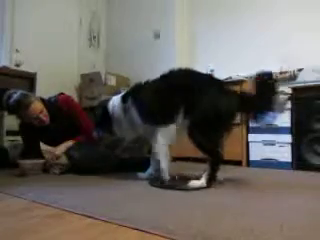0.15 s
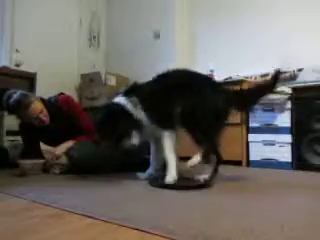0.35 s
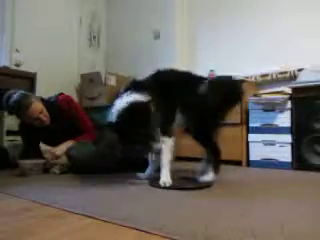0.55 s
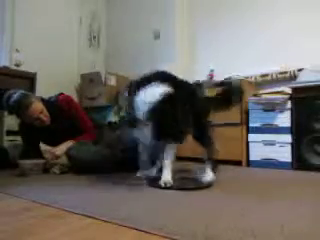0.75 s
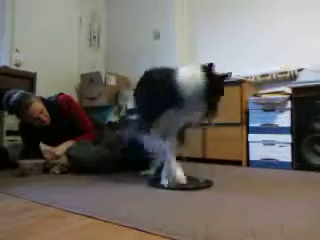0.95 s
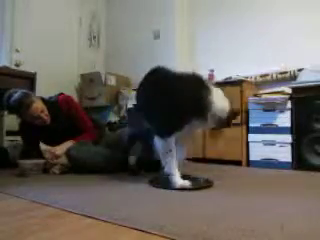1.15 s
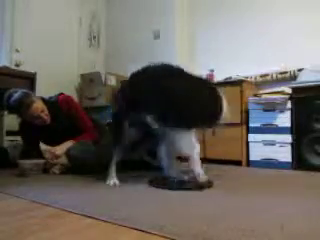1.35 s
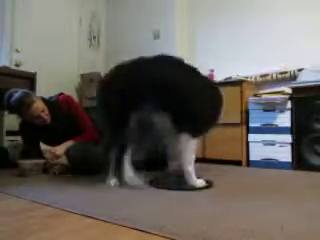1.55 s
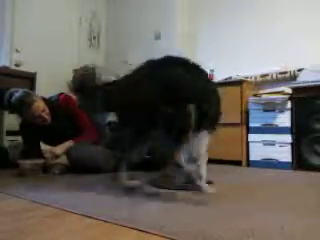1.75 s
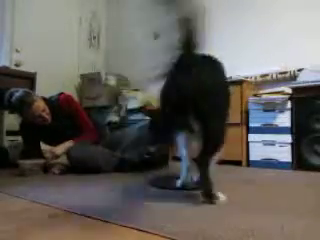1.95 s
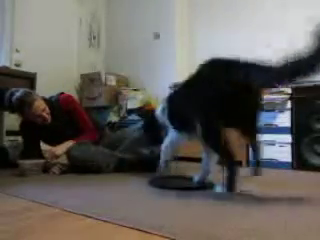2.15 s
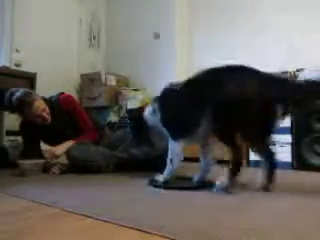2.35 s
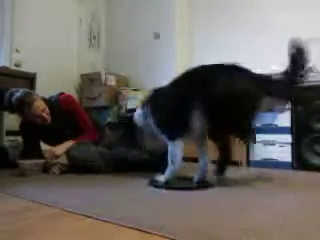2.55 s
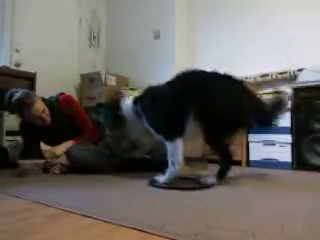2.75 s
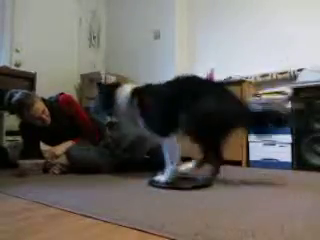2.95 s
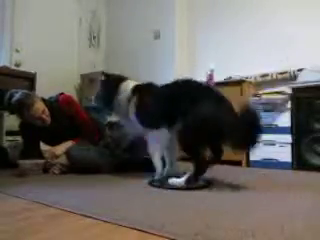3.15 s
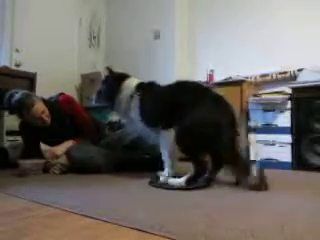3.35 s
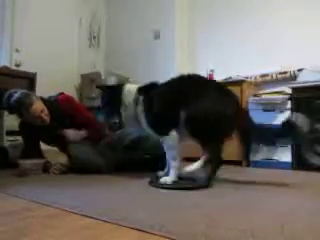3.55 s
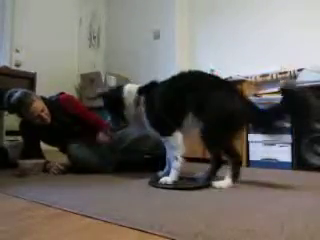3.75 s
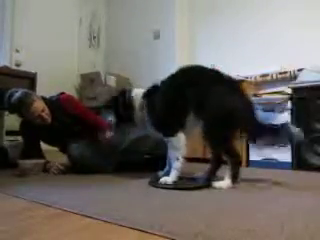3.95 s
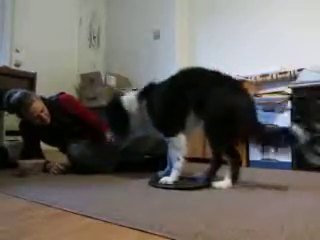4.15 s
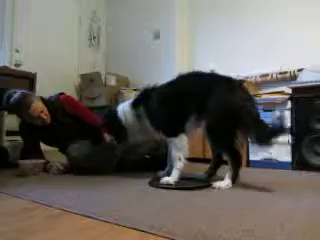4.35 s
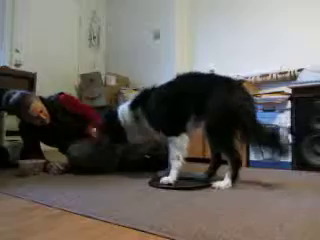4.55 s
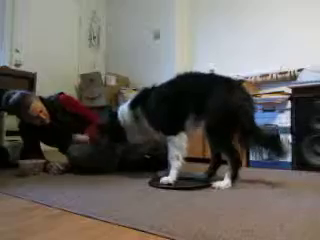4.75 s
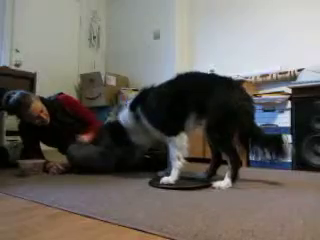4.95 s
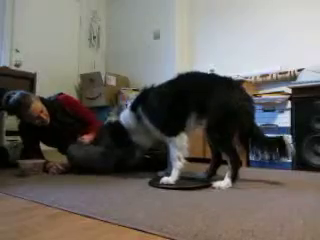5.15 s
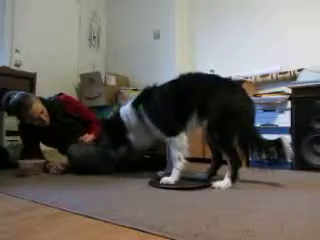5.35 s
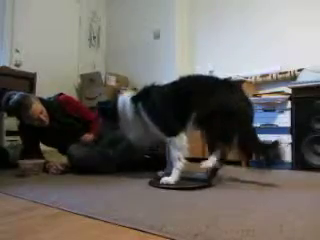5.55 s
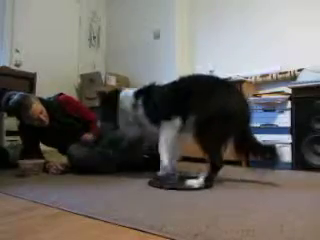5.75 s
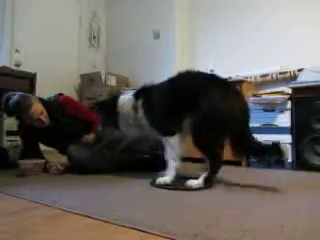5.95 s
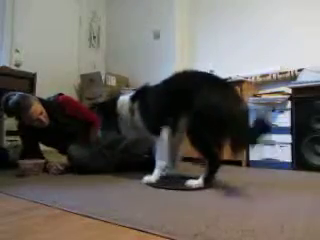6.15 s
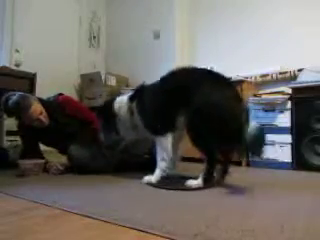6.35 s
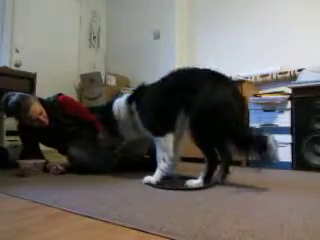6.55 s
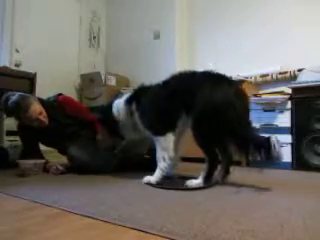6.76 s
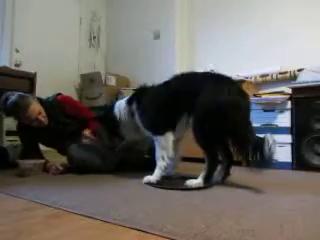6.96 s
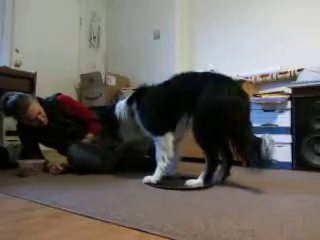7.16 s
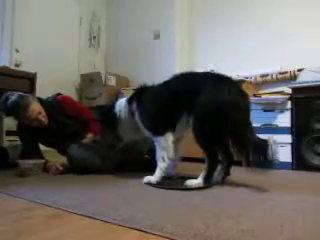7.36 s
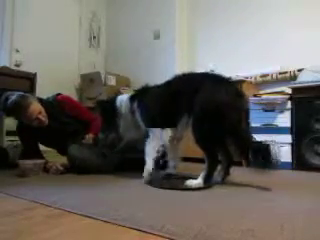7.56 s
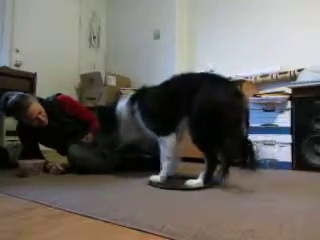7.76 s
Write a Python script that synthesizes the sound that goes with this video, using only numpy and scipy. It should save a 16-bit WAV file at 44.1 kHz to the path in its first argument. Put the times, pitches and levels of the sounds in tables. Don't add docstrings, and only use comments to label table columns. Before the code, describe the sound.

Busy claw taps and padded thumps on a thin metal plate, ringing only briefly, fill the first couple of seconds. Movement thins, then a crisp double click sounds among a few more taps. A quiet stretch of faint rustle follows, then a quick scraping slide, a thump, another double click and small shuffles. Short room tail, steady low rumble and light hiss, heard in stereo from a few metres.

```python
import sys
import numpy as np
from scipy import signal
from scipy.fft import rfft, irfft
from scipy.io import wavfile
from scipy.ndimage import uniform_filter1d

SR = 44100
rng = np.random.default_rng(int(sys.argv[2]) if len(sys.argv) > 2 else 0)


def decibels_to_gain(level_db):
    exponent = np.asarray(level_db, float) / 20
    return 10 ** exponent


def persist_wave(psi):
    counts = np.round(np.clip(psi, -1, 1) * 32767).astype(np.int16)
    wavfile.write(sys.argv[1], SR, np.atleast_2d(counts).T)


N = 344862


def band(x, lo_hz, hi_hz, order=2):
    return signal.sosfilt(signal.butter(order, [lo_hz, hi_hz], "band", fs=SR, output="sos"), x)


def unit(x):
    return x / np.sqrt(np.mean(x ** 2) + 1e-18)


def on_log(hz, table):
    table = np.array(table)
    return np.interp(np.log(hz), np.log(table[:, 0]), table[:, 1])


def seconds(length_s):
    return np.arange(int(length_s * SR)) / SR


def decay(t, t60_s):
    return np.exp(-np.log(1000) * t / t60_s)


def ring(hz, t60_s):
    t = seconds(.3)
    return np.sin(2 * np.pi * hz * t) * decay(t, t60_s)


def ring_all(modes):
    return sum((-1) ** k * decibels_to_gain(db) * ring(hz, t60_s) for k, (hz, db, t60_s) in enumerate(modes))


def add(track, start_s, sound):
    i = int(start_s * SR)
    track[i:i + len(sound)] += sound[:N - i]


def walk(rate_hz):
    hold = int(SR / rate_hz)
    levels = np.repeat(rng.standard_normal(N // hold + 1), hold)
    return uniform_filter1d(uniform_filter1d(levels, hold), hold)[:N]


def spread(size, hz, likeness):
    alike = np.clip(on_log(hz, likeness), -.9, .95)
    mid, side = rng.standard_normal((2, size))
    return np.sqrt(1 + alike) * mid + np.sqrt(1 - alike) * side * np.array([[1], [-1]])


def even(x):
    lines = rfft(x)
    power = np.abs(lines) ** 2
    gain = np.sqrt(np.mean(power) / uniform_filter1d(power, size=12))
    return irfft(lines * gain, len(x))


# pitch_hz, level_db (per Hz)
HUM_COLOUR = [(25, -48), (50, -15), (90, -1.5), (170, -4.5), (240, 4.5), (280, -11.5), (450, -14.5),
              (1000, -22), (2800, -35), (4100, -54.5), (5000, -42), (7000, -42.5), (11500, -51.5),
              (16000, -83)]
# pitch_hz, likeness (-1 to 1)
HUM_LIKENESS = [(60, 0.28), (200, 0.77), (400, -0.35), (800, -0.11), (2500, 0.25), (12000, -0.23)]


def hum():
    noise = 0
    for hz in 28 * 2 ** np.arange(.5, 9.2, .4):
        level = decibels_to_gain(on_log(hz, HUM_COLOUR) + 2.0 * walk(6))
        noise = noise + level * band(spread(N, hz, HUM_LIKENESS), hz * 2 ** -.2, hz * 2 ** .2)
    whine_hz, whine_db = 15735, -90
    whine = decibels_to_gain(whine_db) * np.sqrt(2) * np.sin(2 * np.pi * whine_hz * np.arange(N) / SR)
    return decibels_to_gain(-41.5) * unit(noise) + whine


# middle_s, level_db, bright_minus_dull_db, half_length_s
SWISHES = [(0.01, -29, -10, 0.16), (0.316, -43, -2, 0.096), (0.61, -37.5, -3.5, 0.11),
           (0.858, -41, -10, 0.11), (1.123, -36, -7.5, 0.11), (1.56, -45.5, -8, 0.23),
           (2.048, -38.5, -16, 0.21), (2.39, -61, 17, 0.082), (2.663, -44, -5.5, 0.12),
           (3.11, -49, -11, 0.22), (3.228, -56, -5, 0.064), (3.492, -35.5, -24, 0.072),
           (3.643, -44.5, -7, 0.12), (3.93, -56, -16, 0.11), (4.303, -50, -11, 0.098),
           (4.51, -44, -12.5, 0.11), (4.61, -43, -12, 0.12), (4.896, -45.5, -7.5, 0.18),
           (5.69, -48, -16, .04), (5.967, -27, -30, 0.035), (6.094, -34, -7, 0.063),
           (6.172, -53.5, 14, 0.094), (6.96, -53.5, -7, 0.12), (7.456, -54.5, -22, 0.45),
           (7.823, -45.5, -30, 0.077)]


def swish(bright):
    stir_db, stir_bright_db, edge_drop_db = -58.5, -9, 15
    t = np.arange(0, N + 64, 64) / SR
    power = decibels_to_gain(stir_db + bright * stir_bright_db) ** 2
    for middle_s, db, bright_db, half_s in SWISHES:
        bell_db = -edge_drop_db * ((t - middle_s) / half_s) ** 2
        power = power + decibels_to_gain(db + bright * bright_db + bell_db) ** 2
    return np.interp(np.arange(N) / SR, t, np.sqrt(power))


# pitch_hz, likeness (0 to 1)
LIKENESS = [(60, 0), (250, 1), (1000, 0.45), (4000, 0.08), (12000, 0)]


def rustle():
    dull = unit(band(spread(N, 1500, LIKENESS), 450, 3400)) * swish(False) * decibels_to_gain(2.5 * walk(25) - 2)
    fibres = spread(N, 6200, LIKENESS)
    bright_swish = swish(True)
    bright = unit(band(fibres, 4600, 7500)) * bright_swish * decibels_to_gain(3 * walk(30))
    air = unit(band(fibres, 6800, 17000, order=1)) * bright_swish * decibels_to_gain(-16.0)
    return dull + bright + air


# pitch_hz, t60_s
TAIL = [(125, 0.23), (500, 0.19), (2000, 0.27), (5000, 0.26), (12000, 0.2)]


def room(dry, walls, wet_db):
    t = seconds(.4)
    tail = 0
    for hz in 90 * 2. ** np.arange(8):
        fade = decay(t, on_log(hz, TAIL))
        left, right = band(spread(len(t), hz, LIKENESS), hz / np.sqrt(2), hz * np.sqrt(2)) * fade
        tail = tail + np.array([unit(left), unit(right)]) * np.sqrt(hz / SR * np.mean(fade ** 2))
    answer = decibels_to_gain(wet_db) * tail * (1 - np.exp(-t / 0.001))
    for delay_s, left_db, right_db in walls:
        answer[:, int(delay_s * SR)] += decibels_to_gain(np.array([left_db, right_db]))
    return signal.fftconvolve(dry[None], answer, axes=1)[:, :N]


# start_s, level_db, pressed (1 in, 0 let go)
CLICKER = [
    (3.4152, -10.5, 1),
    (3.54, -9, 0),
    (6.0314, -12, 1),
    (6.1424, -8.5, 0),
]
# pitch_hz, level_db, t60_s
PRESSED = [(2500, -9, .003), (3500, -8, .002), (5000, -3, .003), (6750, 0, .005), (11000, -14, .002)]
# pitch_hz, level_db, t60_s
RELEASED = [(2600, -12, .003), (3400, -7, .002), (4400, 0, .004), (5700, -5, .002), (7000, -9, .002),
            (8800, -12, .002)]


def clicker():
    out = np.zeros(N)
    t = seconds(.02)
    crack_db = 4
    for start_s, db, pressed in CLICKER:
        snap = decibels_to_gain(-21) * rng.standard_normal(len(t)) * np.exp(-t / .001)
        snap[0] += 1
        tongue = ring_all(PRESSED if pressed > .5 else RELEASED)
        add(out, start_s, decibels_to_gain(db) * signal.fftconvolve(snap, tongue))
        add(out, start_s, decibels_to_gain(db + crack_db) * band(snap, 1700, 8500, order=1))
    return band(out, 1900, 15500)


# start_s, level_db, pitch_hz
PADS = [(0.003, -23, 196), (0.032, -15.5, 364), (0.469, -18.5, 287), (0.583, -19.5, 307),
        (0.731, -32.5, 224), (0.812, -26.5, 323), (1.059, -20.5, 360), (1.268, -15, 365), (1.661, -30, 587),
        (1.769, -16, 557), (1.776, -13.5, 359), (2.014, -18, 360), (2.188, -30.5, 358), (2.301, -20, 397),
        (2.66, -23, 321), (2.902, -28.5, 311), (3.034, -35.5, 220), (3.143, -24.5, 214),
        (3.435, -32.5, 247), (3.78, -20, 290), (3.994, -45, 225), (4.316, -35.5, 165), (5.007, -37, 196),
        (5.682, -29, 168), (5.782, -24.5, 230), (5.921, -28.5, 193), (6.23, -21, 236), (6.385, -23.5, 353),
        (7.563, -35, 166), (7.749, -39, 205)]


def pads():
    out = np.zeros(N)
    t = seconds(.3)
    boom_cycles = 29.8
    rattles = band(rng.standard_normal((len(PADS), len(t))), 84, 440)
    for (start_s, db, hz), noise in zip(PADS, rattles):
        t60_s = boom_cycles / hz
        boom = 0.76 * ring(hz, .5 * t60_s)
        rattle = 0.33 * unit(noise) * decay(t, t60_s)
        add(out, start_s, decibels_to_gain(db - 6.0) * (boom + rattle))
    return out


# pitch_hz, level_db, t60_s
TRAY = [(352, -4, .08), (580, -4, .07), (820, -6, .05), (1590, -3, .05), (1875, -3, .05), (2190, -1, .06),
        (2700, -4, .05), (2890, -7, .06), (2980, -8, .05)]


def sheet(force):
    return force + decibels_to_gain(-50) * signal.fftconvolve(force, ring_all(TRAY))[:N]


def slide():
    peak_s, peak_db, rise_s, fall_s = 5.745, -23, 0.033, 0.017
    grains = rng.standard_normal(N) * decibels_to_gain(1.1 * rng.exponential(size=N))
    late_s = np.arange(N) / SR - peak_s
    push = decibels_to_gain(peak_db - 10 * (late_s / np.where(late_s < 0, rise_s, fall_s)) ** 2)
    scrape = band(grains, 1860, 7700) + 0.14 * band(grains, 5900, 16000)
    return decibels_to_gain(-7.0) * push * unit(sheet(scrape))


# start_s, level_db, flex_minus_sheet_db, tip_minus_sheet_db, pitch_hz
SCUFFS = [(0.2219, -30, -14, -6.5, 3250), (0.4409, -11, -24, -4, 3200), (0.4464, -26, 4, -1, 3100),
          (0.4594, -8, -24, -20, 2980), (0.5871, -17, -9.5, -5, 2190), (0.609, -27, -24, 1, 3030),
          (1.068, -13, -45, 1.5, 3050), (1.0744, -18, -4.5, -1.5, 3700), (1.4531, -10, -17, -23, 2910),
          (1.7724, -1.5, -15.5, -25, 2210), (3.4464, -14.5, -26, -5.5, 2820), (3.4624, -15, -38, -16, 2760),
          (3.7623, -12, -15.5, -17, 2130), (5.9184, -7, -19.5, -11.5, 3096), (6.3584, -23, -19, -1, 3070),
          (6.384, -25, -20, -8, 1960)]
# start_s,
# level_db, flex_minus_sheet_db, tip_minus_sheet_db, pitch_hz
TICKS = [(0.0084, -11, -15, -21, 2210), (0.0318, -1, -11.5, -22, 1940), (0.63, -16.5, -27, -0.5, 3020),
         (0.833, -9.5, -27, -7.5, 2230), (0.64, -31, -14, -6, 3040), (0.8416, -21, -20, -11, 2170),
         (1.265, -3, -14.5, -4, 2920), (2.0072, -3.5, -15.5, -8.5, 2130), (2.3169, -7.5, -29, -2, 3100),
         (2.3312, -19.5, -28, 8, 3100), (3.003, -30.5, -14, -2.5, 3460), (3.0354, -30.5, -5, 3, 5800),
         (3.4431, -15, -6.5, -9, 1490), (5.273, -48, 4, 4.5, 6360), (6.3839, -27, -21, 8, 4500)]
# start_s, level_db, flex_minus_sheet_db, tip_minus_sheet_db
TOUCHES = [(0.0034, -42, -20, -35), (0.0635, -22, -5, -3), (1.393, -42, 7, -6), (1.608, -40, -22, -9),
           (1.6407, -31, -5, -4), (1.868, -36, 5, 4.5), (2.134, -35, -18, -2.5), (2.661, -33, -0.5, -17),
           (2.7182, -43.5, -9, 3), (2.7885, -37, -18, -36), (2.8612, -36.5, -10, -21), (2.897, -50, -2, -2),
           (3.1477, -30.5, 0, -21), (3.2064, -33.5, -18, -13), (3.235, -32, -20, -5),
           (3.3466, -45, 15.5, -12), (4.216, -47.5, 1, -11), (5.415, -53.5, 4, -20),
           (6.2244, -29.5, -16, -15), (7.219, -42, -14, -27), (7.503, -36, -12, -30),
           (7.5646, -40, -31, -15), (7.7844, -38, -6.5, -19)]


def claws():
    flex, plate, tip, edge, tone = np.zeros((5, N))
    t = seconds(.08)
    scuff_drag_s, tick_drag_s, touch_drag_s, touch_hz = 0.0057, 0.0016, 0.0053, 2450
    strikes = [(*row, scuff_drag_s) for row in SCUFFS]
    strikes += [(*row, tick_drag_s) for row in TICKS]
    strikes += [(*row, touch_hz, touch_drag_s) for row in TOUCHES]
    for start_s, db, flex_db, tip_db, hz, drag_s in strikes:
        chatter = rng.standard_normal(len(t)) * decibels_to_gain(2.8 * rng.exponential(size=len(t)))
        force = decibels_to_gain(-18.0) * chatter * np.exp(-t / drag_s)
        force[0] += decibels_to_gain(-5.5)
        force = even(force) * np.exp(-t / .03)
        add(flex, start_s, decibels_to_gain(db + flex_db) * force)
        add(plate, start_s, decibels_to_gain(db) * force)
        add(tip, start_s, decibels_to_gain(db + tip_db) * force)
        add(edge, start_s, decibels_to_gain(db + 1.07 * tip_db) * force)
        patch = ring(hz, 0.024)[:1024]
        tone_db = db + tip_db * (hz > 3500)
        add(tone, start_s, decibels_to_gain(tone_db) * signal.fftconvolve(force, patch))
    struck = decibels_to_gain(22.5) * band(flex, 340, 1690)
    struck += decibels_to_gain(10.0) * band(plate, 1510, 2875, order=1)
    struck += decibels_to_gain(11.5) * band(tip, 1530, 6750)
    struck += decibels_to_gain(-8) * band(edge, 5000, 17000, order=1)
    return sheet(struck) + decibels_to_gain(-22) * tone


# delay_s, left_db, right_db
TRAY_WALLS = [(0, 3.5, 6.5), (.0012, -8, -20), (.0038, -24, -2), (.0083, -1, -14), (0.0149, -9.5, -22)]
# delay_s, left_db, right_db
HAND_WALLS = [(0, -2, -3), (.0016, -4, -5), (.0032, -7, -6), (.0081, -1, 1), (.0097, -3, -3),
              (.0204, -8, -8), (.022, -9, -7)]


def scene():
    tray = room(claws() + pads() + slide(), TRAY_WALLS, wet_db=-18)
    hand = room(clicker(), HAND_WALLS, wet_db=-21.5)
    return tray + hand + rustle() + hum()


def low_pass(x):
    return signal.sosfilt(signal.butter(12, 16850, fs=SR, output="sos"), x)


def record(dry):
    soft = np.tanh(1.2 * band(dry, 40, 19000)) / 1.2
    top_hz = 15950
    mix = signal.sosfilt(signal.ellip(8, .2, 60, top_hz, fs=SR, output="sos"), soft)
    return low_pass(mix)


dry = scene()
out = record(dry)
persist_wave(out)
```